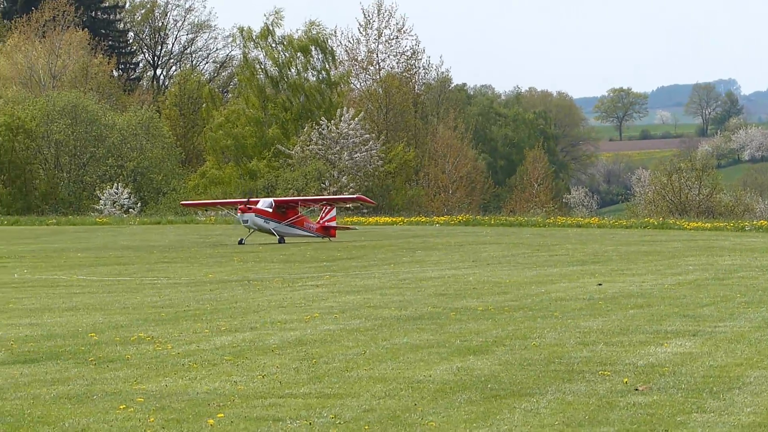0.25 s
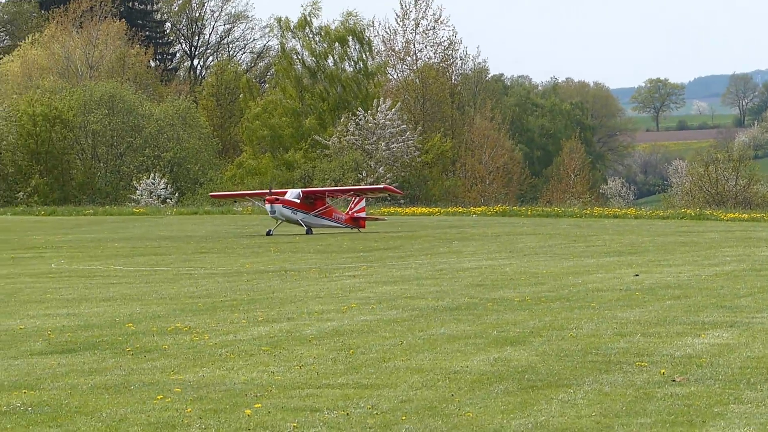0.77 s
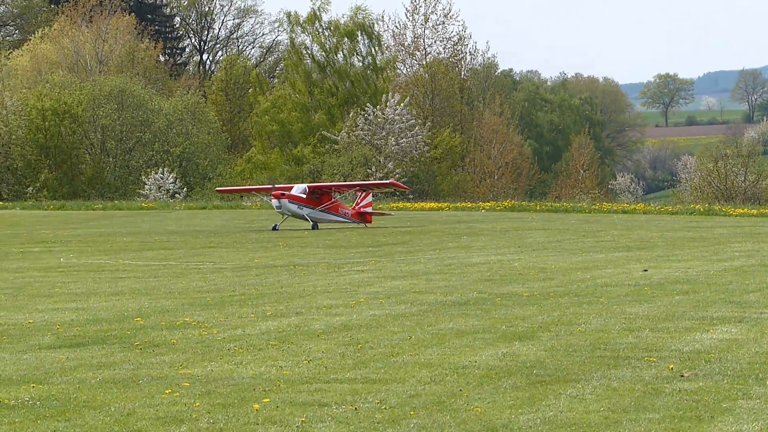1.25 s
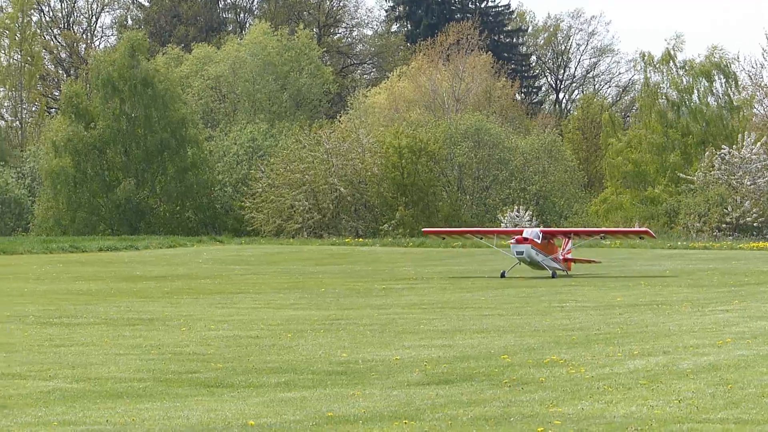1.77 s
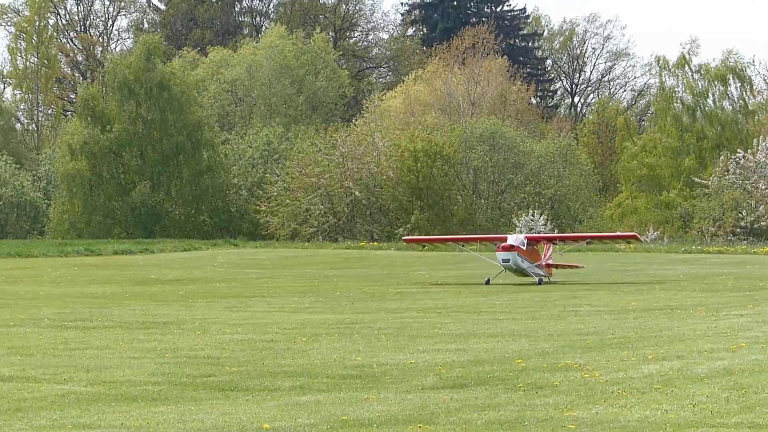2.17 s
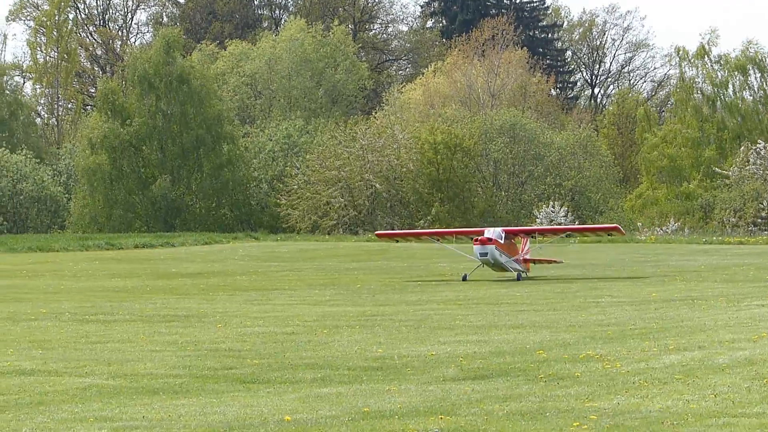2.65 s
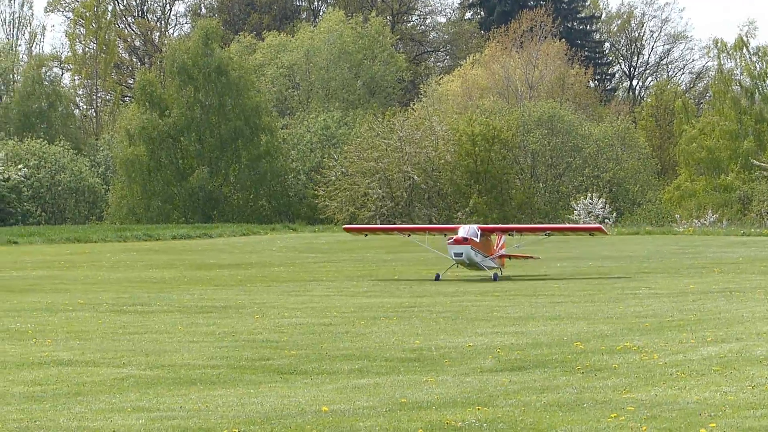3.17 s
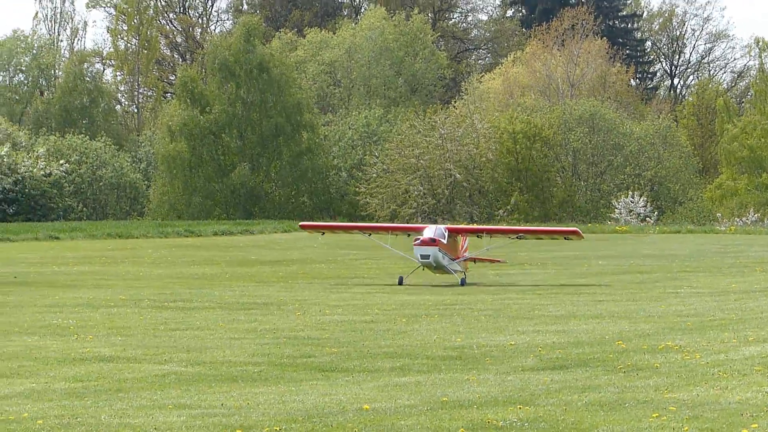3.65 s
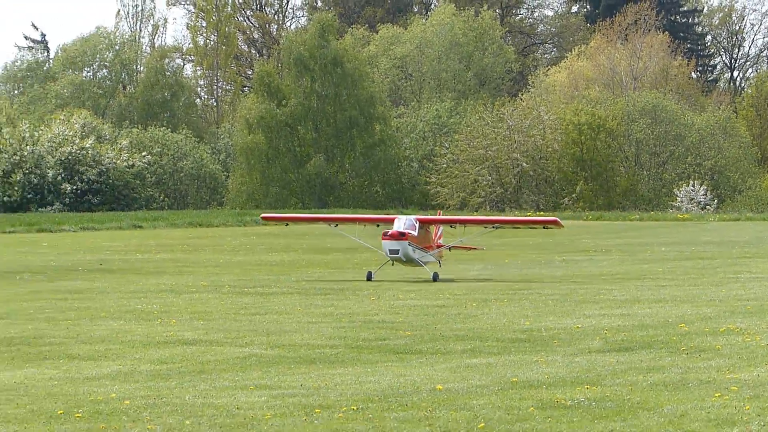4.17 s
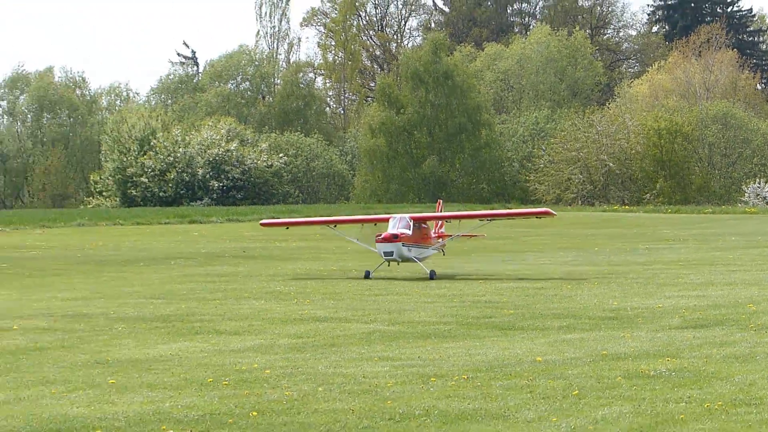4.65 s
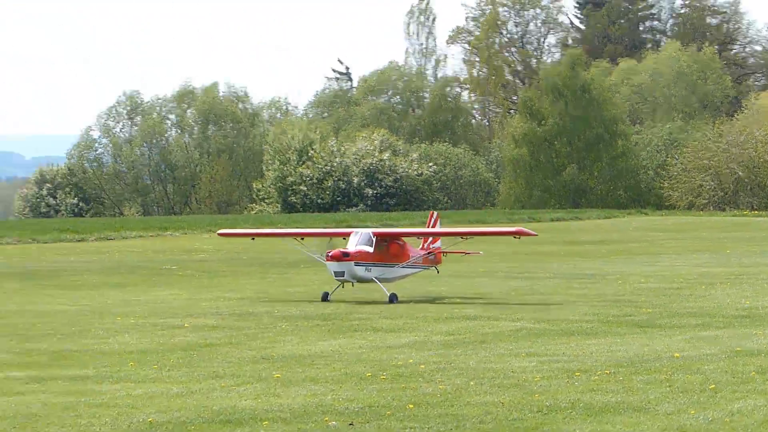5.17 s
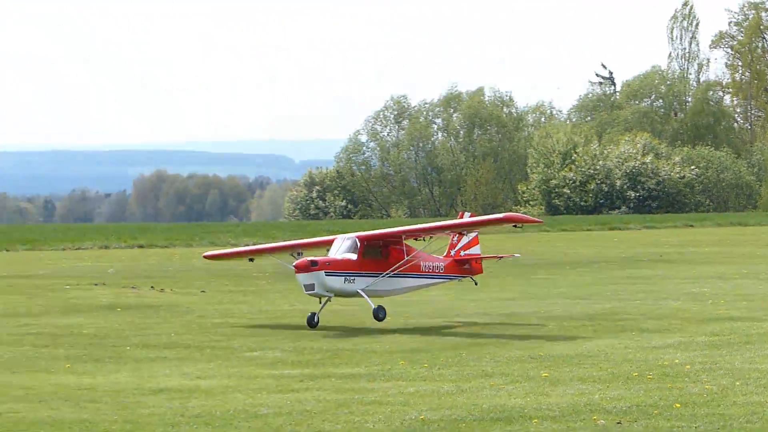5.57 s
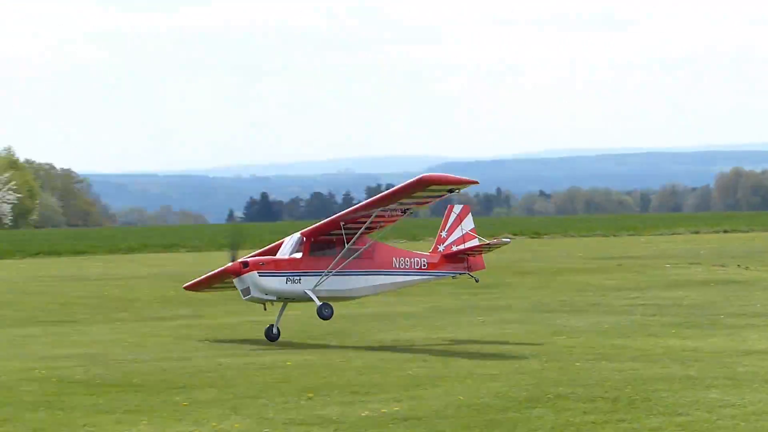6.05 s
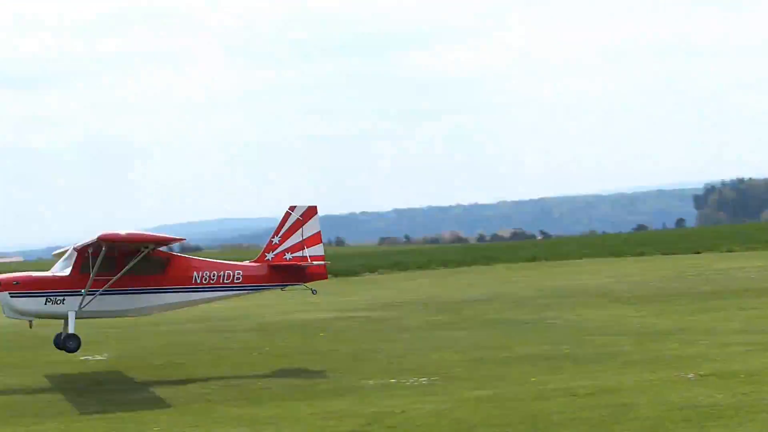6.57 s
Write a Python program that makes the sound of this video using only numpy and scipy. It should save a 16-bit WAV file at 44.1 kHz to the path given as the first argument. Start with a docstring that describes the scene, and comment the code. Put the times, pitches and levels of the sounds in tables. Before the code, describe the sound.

Thumping wind and brief bird whistles cut to silence, then a small propeller plane's low hum climbs into a loud rasping buzz passing nearby.

```python
"""Petrol model plane over a grass field

Two scenes with a silent gap between them. The first, mono, has wind on a microphone, field hiss
and birds, made of shaped noise, decaying thumps and gliding tones. In the second, stereo, the
engine revs up and comes near: cosines at low multiples of the shaft speed, exhaust pulses mixed
with noise that puffs at each firing, and propeller hiss, with wind on the two microphone ports."""
import sys
import numpy as np
from scipy import signal
from scipy.fft import rfft, irfft, next_fast_len
from scipy.io import wavfile
from scipy.ndimage import uniform_filter1d

SR = 44100
rng = np.random.default_rng(int(sys.argv[2]) if len(sys.argv) > 2 else 0)


def amplitude_ratio(level_db):
    """Convert a level in decibels to the matching linear amplitude (field) ratio."""
    exponent = np.asarray(level_db, float) / 20
    return 10 ** exponent


def unload_wav(signal):
    """Save mono or channel-first audio to the path in sys.argv[1] as 16-bit WAV at rate SR, clipped to [-1, 1]."""
    wavfile.write(
        sys.argv[1],
        SR,
        np.round(np.clip(np.atleast_2d(signal).T, -1, 1) * 32767).astype(np.int16),
    )


N = 300321


def evened(x):
    """Normalisation: scales to rms 1."""
    return x / np.sqrt(np.mean(x ** 2) + 1e-20)


def read(points, hz):
    """Interpolation of a spectrum along a log-frequency axis."""
    f, value = np.transpose(points)
    return np.interp(np.log(hz + 1), np.log(f + 1), value)


def follow(rows):
    """Linear interpolation in time: joins each column of a curve table at every sample."""
    s, *columns = np.transpose(rows)
    return [np.interp(np.arange(N) / SR, s, c) for c in columns]


def filtered(x, response):
    """Linear filtering: multiplies the spectrum of x by response(Hz)."""
    size = next_fast_len(N + SR // 4)
    hz = np.fft.rfftfreq(size, 1 / SR)
    return irfft(rfft(x, size) * response(hz), size)[..., :N]


def coloured(x, points):
    """Spectral shaping: colours x by a spectrum in dB and scales it to rms 1."""
    return evened(filtered(x, lambda hz: amplitude_ratio(read(points, hz))))


def drift(seconds, channels=1):
    """Low-passed random process of rms 1 that changes over the given time."""
    size = int(seconds * SR)
    noise = rng.standard_normal((channels, N))
    return evened(uniform_filter1d(uniform_filter1d(noise, size), size))


def bumps(rows):
    """Superposed bell-shaped level changes, given as (middle s, length s, dB)."""
    t = np.arange(N) / SR
    return sum(db * np.exp(-((t - s) / (length / 2)) ** 2) for s, length, db in rows)


# Shaft speed. Each row: time in seconds, turns per second.
SHAFT_SPEED = [(1.61, 49.7), (1.87, 51.3), (2.16, 54.28), (2.47, 55.9), (2.69, 58.06), (2.94, 63),
               (3.12, 64), (3.51, 65.1), (3.86, 70.2), (4.46, 70.2), (4.85, 73.1), (5.07, 76.67),
               (5.42, 85.2), (5.62, 87), (5.99, 89.6), (6.32, 89.6), (6.5, 89.1), (6.63, 88.2),
               (6.81, 87.8)]


def engine():
    """Rotating source: one shaft phase drives the low orders and the exhaust; airflow adds a roar."""
    speed = uniform_filter1d(follow(SHAFT_SPEED)[0], size=SR // 8)  # the propeller's inertia
    turns = np.cumsum(speed * (1 + .001 * drift(.05)[0])) / SR
    return low_orders(turns, speed) + exhaust(turns, speed) + airflow_roar()


# Source levels. Each row: time in seconds, level of the higher shaft orders in dB,
# exhaust rasp in dB, propeller hiss in dB.
ENGINE_LEVELS = [(1.61, -56.5, -73, -57.5), (1.85, -57.5, -80, -61.5), (2.0, -53, -72, -60),
                 (2.045, -50, -73, -52), (2.1, -52, -70, -60), (2.4, -55.5, -56.5, -62),
                 (2.8, -54, -51, -55), (3.1, -47.5, -48, -52.5), (3.5, -47.5, -48.5, -50),
                 (3.65, -45, -45.5, -46.5), (3.85, -40.5, -44, -44.5), (4.03, -44, -43, -46.5),
                 (4.09, -42, -44, -50), (4.18, -42.5, -44, -49.5), (4.4, -40, -42.5, -45),
                 (4.6, -42, -41, -35), (4.9, -37, -37, -30.5), (5.08, -34.5, -36.5, -34),
                 (5.25, -38.5, -32.5, -30.5), (5.5, -35, -33, -31), (5.75, -36, -28, -30),
                 (5.9, -35, -30, -28.5), (6.1, -34, -31, -31.5), (6.3, -32, -32, -28.5),
                 (6.55, -31, -26, -29), (6.65, -27, -31.5, -30.5), (6.81, -30.5, -28, -32.5)]
# Hum at twice the shaft speed, growing as the plane nears. Each row: time in seconds, level in dB.
SECOND_ORDER = [(1.61, -49), (1.95, -70), (2.2, -54), (2.45, -51.5), (2.95, -39.5), (3.45, -43.5),
                (3.9, -33.5), (4.45, -38), (5.07, -27), (5.22, -27.5), (5.4, -22.5), (6.4, -21),
                (6.52, -23.5), (6.7, -32), (6.81, -30)]
# Third order, which swells and fades by itself. Each row: time in seconds, level in dB.
THIRD_ORDER = [(1.61, -48), (1.76, -40), (1.92, -41.5), (2.05, -31), (2.4, -38), (2.55, -35.5), (2.63, -42),
               (2.7, -59), (2.86, -33), (3.1, -53), (3.32, -50), (3.55, -39), (3.9, -39), (4.3, -39.5),
               (4.4, -44), (4.5, -40), (4.8, -39), (4.92, -33.5), (5.1, -29), (5.23, -22), (5.36, -26),
               (5.48, -40), (5.56, -29), (5.8, -45), (6.4, -45.5), (6.56, -35.5), (6.81, -29)]
# Strength of the higher orders. Each row: multiple of the shaft speed, relative level in dB.
HIGHER_ORDERS = [(4, 4.5), (5, -3.5), (6, -1), (7, -2.5), (8, 1), (9, -3.5), (10, -2.5)]
# Gain of the higher orders by frequency. Each row: frequency in Hz, gain in dB.
BODY_GAIN = [(195, 10), (220, -5), (245, 2.5), (270, 3.5), (310, -4), (360, -4), (420, -4), (480, -2),
             (540, 1), (600, -3.5), (680, -4.5), (760, -8.5), (900, -13)]
# Single orders swell or sink for a while. Each row: middle in seconds, length in seconds,
# multiple of the shaft speed, change in dB.
ORDER_SWELLS = [(1.774, 0.19, 4, 9.5), (1.993, 0.13, 9, 11), (2.033, 0.29, 5, 12.5), (2.69, 0.23, 10, 14),
                (2.762, 0.26, 4, 15), (3.25, 0.8, 9, 7.5), (3.992, 0.29, 10, 7), (4.4, 0.67, 9, -19),
                (1.9, .3, 7, -12), (2.243, 0.16, 4, 8), (2.4, 0.16, 4, -10), (2.685, 0.22, 8, 5),
                (2.7, .15, 9, 4), (2.85, .15, 9, -3), (2.85, .2, 6, -3), (3.1, 0.34, 6, 3.5),
                (3.42, 0.62, 7, -13), (3.6, 0.17, 9, 4), (3.75, 0.12, 6, -9), (3.75, 0.17, 5, -9),
                (4.1, 0.37, 5, -7), (4.644, 0.24, 7, 5), (4.654, 0.13, 6, -4), (4.85, 0.23, 10, -14),
                (5.398, .25, 10, -4), (5.463, 0.2, 5, -9), (6.25, 0.2, 8, -5.5), (4.876, 0.21, 6, 6),
                (5.425, 0.14, 7, 10), (5.89, 0.41, 10, 11.5), (5.945, 0.25, 7, -9), (6.65, 0.32, 5, -34),
                (6.65, 0.65, 8, 3.5), (6.636, 0.44, 9, -22)]


def low_orders(turns, speed):
    """Harmonic series of the shaft: moving air fades each higher order by itself."""
    even_fade_db, odd_fade_db, fade_s = 1.0, 2.0, .07
    upper_db, rasp_db, _ = follow(ENGINE_LEVELS)
    orders = [(1, rasp_db - 22.0), (2, follow(SECOND_ORDER)[0]), (3, follow(THIRD_ORDER)[0])]
    fades = drift(fade_s, channels=len(HIGHER_ORDERS))
    for (k, strength_db), fade in zip(HIGHER_ORDERS, fades):
        depth_db = odd_fade_db if k % 2 else even_fade_db
        fade_db = depth_db * fade - np.log(10) / 20 * depth_db ** 2  # keeps the mean power
        swells = [(s, length, db) for s, length, multiple, db in ORDER_SWELLS if round(multiple) == k]
        fade_db = fade_db + bumps(swells)
        orders.append((k, upper_db + strength_db + read(BODY_GAIN, k * speed) + fade_db))
    wobble_db = 0.95 * drift(0.016, channels=len(orders))
    low = np.zeros(N)
    for (k, db), wobble in zip(orders, wobble_db):
        phase = k * turns + 0.0593 * k ** 2  # in cycles
        low += amplitude_ratio(db + wobble) * np.cos(2 * np.pi * phase)
    return np.sqrt(2) * low


# Spectrum of the airflow. Each row: frequency in Hz, relative level in dB.
ROAR_SPECTRUM = [(60, -51), (120, -6), (300, -1.5), (600, -16), (800, -46.5), (1100, -46)]


def airflow_roar():
    """Broadband flow noise: shaped noise whose level in dB rises half as fast as the rasp's."""
    rasp_db = follow(ENGINE_LEVELS)[1]
    return amplitude_ratio(0.51 * rasp_db - 28.0) * coloured(rng.standard_normal(N), ROAR_SPECTRUM)


def firing_pulses(turns, speed):
    """Periodic excitation: upper orders as regular pulses, and noise modulated at each firing."""
    firing_spread_db = .9  # each turn fires with its own strength
    upper_fade_db, upper_fade_s = 2.2, .22  # the upper orders come and go one by one
    shaky = turns + .0007 * drift(.006)[0]
    lag = np.cumsum(.17 * rng.standard_normal(70))  # the pipe smears each pulse, in cycles
    steps = rng.standard_normal((N // 256 + 1, 70))
    steps = uniform_filter1d(steps, size=round(upper_fade_s * SR / 256), axis=0)
    fade = evened(uniform_filter1d(steps, size=6, axis=0))
    fades = amplitude_ratio(upper_fade_db * fade - np.log(10) / 20 * upper_fade_db ** 2)
    regular = np.zeros(N)
    for k in range(11, 70):
        # two firings a turn, the second weaker, so that odd orders stay
        strength = (1 + 0.26 * (-1) ** k) * np.repeat(fades[:, k], 256)[:N]
        regular += strength * np.cos(2 * np.pi * (k * shaky + lag[k]))
    regular *= 2 * np.sqrt(speed / SR)  # as dense per Hz as white noise
    turn_db = firing_spread_db * rng.standard_normal(int(turns[-1]) + 2)
    firing_db = turn_db[np.round(turns).astype(int)]
    regular *= amplitude_ratio(uniform_filter1d(firing_db, size=100) - np.log(10) / 20 * firing_spread_db ** 2)
    half = 2 * turns
    strength_db = firing_db - 5 * (np.floor(half) % 2) + 1.3 * drift(0.0011)[0]
    puff = 0.77 + amplitude_ratio(strength_db) * np.exp(-(half % 1) / 0.69)
    return regular, evened(puff * rng.standard_normal(N))


# Rasp of pipe and cowl, far and near. Each row: frequency in Hz, relative level in dB per Hz.
FAR_RASP, NEAR_RASP = [(470, -38), (800, -7), (970, 0.5), (1040, -3.5), (1160, 8), (1300, 4.5),
                       (1540, -7.5), (1930, -6), (2230, -5.5), (2420, -13), (3100, -18), (4030, -36),
                       (6820, -120)], [(470, -39), (800, -4), (896, 2), (938, -3), (1060, -9.5),
                                         (1550, 2.5), (2080, 7.5), (2230, -2), (2500, 16), (2900, -3),
                                         (3100, 8), (4030, -6), (6820, -120)]
# Propeller hiss, far and near. Each row: frequency in Hz, relative level in dB per Hz.
FAR_HISS, NEAR_HISS = [(1760, -11), (3000, -28), (3320, -19), (3610, 8), (3840, -0.5), (4170, 4.5),
                       (4520, 0), (5190, 5.5), (6410, 1), (9470, 0.5), (13600, -17), (14600, -29),
                       (15400, -23)], [(1760, -21), (3000, 15.5), (3130, 6), (3420, -7), (4030, 4.5),
                                         (4250, 2), (4460, -3), (5080, 2), (5550, -2), (6030, -6.5),
                                         (7200, -3.5), (9280, -5), (13500, -17), (15400, -29)]
# Hump of the silencer. Each row: frequency in Hz, relative level in dB.
SILENCER_HUMP = [(330, -23), (450, 6), (580, 9.5), (720, 7), (800, -21), (950, -45)]
# Bark of the pipe, a broad hump that slides as the plane turns past.
# Each row: time in seconds, centre in Hz, gain in dB.
PIPE_BARK = [(1.61, 1500, -4.5), (4.1, 1500, 1), (4.35, 1430, -6), (5.2, 1390, -4.5), (5.55, 2020, 2),
             (5.8, 1800, 2.5), (6.05, 1590, 3), (6.25, 1540, 3), (6.45, 1560, 1), (6.57, 1490, 9),
             (6.65, 1420, 5.5), (6.75, 1400, 2.5), (6.81, 1390, 0)]
# A higher resonance of the cowl that swells and sinks. Each row: time in seconds, centre in Hz, gain in dB.
COWL_RING = [(1.61, 2300, -6), (4.1, 2500, 0), (4.5, 2400, 2), (5.2, 2540, -1.5), (5.55, 2580, -3),
             (5.8, 2500, -4.5), (6.1, 2500, -1.5), (6.35, 2520, 3), (6.55, 2700, 2), (6.81, 2500, 0)]


def exhaust_power(hz, frames, near, hump_db, rasp_db, hiss_db):
    """Source-filter principle: power spectra of silencer, rasp and hiss under moving resonances."""
    power = 0
    for far_points, near_points, db in ((SILENCER_HUMP, SILENCER_HUMP, hump_db),
                                        (FAR_RASP, NEAR_RASP, rasp_db),
                                        (FAR_HISS, NEAR_HISS, hiss_db)):
        shape_db = np.outer(read(far_points, hz), 1 - near) + np.outer(read(near_points, hz), near)
        shape = amplitude_ratio(shape_db) ** 2
        power = power + shape / shape.mean(0) * amplitude_ratio(db[frames]) ** 2
    for rows, octaves in ((PIPE_BARK, 0.21), (COWL_RING, 0.17)):
        centre_hz, peak_db = (c[::256][frames] for c in follow(rows))
        distance = np.log2((hz[:, None] + 1) / centre_hz) / octaves
        power = power * amplitude_ratio(peak_db * np.exp(-distance ** 2)) ** 2
    return power


def air_patches(shape):
    """Propagation through uneven air: random level patches in frequency and time."""
    patches = rng.standard_normal(shape[::-1]).T
    for _ in range(2):
        patches = uniform_filter1d(uniform_filter1d(patches, size=4, axis=0), size=12, axis=1)
    return amplitude_ratio(1.4 * evened(patches))  # spread in dB


# Colour from far to near. Each row: time in seconds, nearness from 0 to 1.
NEARNESS = [(1.61, 0), (2.2, 0.03), (2.5, 0.37), (4.0, 0.1), (4.08, 0), (4.18, 0.37), (4.5, 0.58),
            (5.3, 0.51), (5.7, 0.7), (6.2, 0.61), (6.81, 0.56)]
# Regularity of the exhaust. Each row: frequency in Hz, amplitude share of regular pulses.
PULSE_SHARE = [(500, .93), (1000, .86), (1600, .87), (2600, .8), (3600, .58), (4500, .45), (6000, .25)]


def exhaust(turns, speed):
    """Short-time spectral filtering: regular pulses and puffing noise mixed by frequency and coloured."""
    flicker_db, flicker_s = 0.53, 0.068  # the near exhaust flickers
    near = follow(NEARNESS)[0]
    upper_db, rasp_db, hiss_db = follow(ENGINE_LEVELS) + flicker_db * near * drift(flicker_s)
    upper_db, rasp_db, hiss_db, near = (c[::256] for c in (upper_db, rasp_db, hiss_db, near))
    pulses = firing_pulses(turns, speed)
    hz, _, (lines, noise) = signal.stft(pulses, SR, nperseg=1024, noverlap=768)
    hump_db = upper_db + 0.5 - 2.0 * near  # the silencer's hump recedes nearby
    frames = np.minimum(np.arange(noise.shape[1]), len(near) - 1)
    power = exhaust_power(hz, frames, np.clip(near[frames], 0, 1), hump_db, rasp_db, hiss_db)
    clean = read(PULSE_SHARE, hz)[:, None]
    mixed = clean * lines + np.sqrt(1 - clean ** 2) * noise
    z = mixed * np.sqrt(power) * air_patches(noise.shape)
    return surged(signal.istft(z, SR, nperseg=1024, noverlap=768)[1][:N])


# Sudden flares of the exhaust. Each row: start in seconds, strength in dB before the envelope,
# decay in seconds (half the time in which the fall reaches 1/e).
RASP_SURGES = [(5.24, 1, 0.02), (5.42, 2.5, 0.026), (5.54, 4, 0.018), (5.612, 4.5, 0.013),
               (5.635, 2, 0.012), (5.692, 7.5, 0.017), (5.76, 3, 0.025), (5.803, 6.5, 0.013),
               (5.828, 4, 0.019), (5.914, 5.5, 0.021), (6.006, 6, 0.018), (6.053, 4, 0.012),
               (6.15, 3.5, 0.036), (6.375, 3.5, 0.025), (6.48, 0, 0.016), (6.52, 3, 0.012),
               (6.565, 1, 0.014), (6.667, 4.5, 0.022), (6.738, 4, 0.018), (6.795, 1.5, .02)]


def surged(x):
    """Transient modulation: sudden flares that die away, strongest in one band."""
    rise_s, centre_hz, octaves = .002, 1930, 1
    outside = 0.42  # share of the dB outside the band
    t, surge_db = np.arange(N) / SR, np.zeros(N)
    for s, db, decay_s in RASP_SURGES:
        age = np.maximum(t - s, 0)
        surge_db += db * (1 - np.exp(-age / rise_s)) * np.exp(-(age / (2 * decay_s)) ** 2)
    band = filtered(x, lambda hz: np.exp(-(np.log2((hz + 1) / centre_hz) / octaves) ** 2))
    return amplitude_ratio(surge_db) * band + amplitude_ratio(outside * surge_db) * (x - band)


# Level difference of the ports. Each row: frequency in Hz, left over right in dB.
PORT_LEVEL = [(60, 4), (110, 2.5), (200, 9), (380, 5.0), (700, -2), (1290, -3), (2370, -1.0), (4380, 0.5),
              (8090, -1.5), (14900, 2.5)]
# Phase difference of the ports. Each row: frequency in Hz, lead of the left in radians.
PORT_LEAD = [(40, -0.58), (130, 0.17), (250, -0.82), (430, -1.1), (700, -0.58), (1380, -0.1), (2070, -0.36),
             (2330, -0.0), (15100, -0.0)]


def ports(x):
    """Interchannel differences: two ports differ in level and, in the bass, phase; their mean is x."""
    def pair(hz):
        ratio = amplitude_ratio(read(PORT_LEVEL, hz)) * np.exp(1j * read(PORT_LEAD, hz))
        return 2 * np.array([ratio, np.ones(len(hz))]) / (1 + ratio)
    return filtered(x, pair)


def diffuse(x, size, decay_s):
    """Reverberation: convolves x with a noise tail of unit energy that falls 60 dB in decay_s."""
    t = np.arange(size) / SR
    tail = rng.standard_normal(size) * amplitude_ratio(-60 * t / decay_s)
    return signal.fftconvolve(x, tail / np.linalg.norm(tail))[:N]


# Sound scattered by grass and trees. Each row: frequency in Hz, level relative to the direct sound in dB.
SCATTER_LEVEL = [(60, -16), (200, -48), (500, -10.5), (1000, -8), (2000, -22.5), (2600, -46), (4000, -76),
                 (8000, -26.5)]


def scattered(x):
    """Diffuse scattering: a short tail of opposite sign in the two ports."""
    wet = diffuse(x, SR // 8, 0.14)
    return np.outer([1, -1], filtered(wet, lambda hz: amplitude_ratio(read(SCATTER_LEVEL, hz))))


def lumpy(points, lumps_db, channels=1):
    """Turbulence: eddies of uneven size burst on the membrane."""
    noise = rng.standard_normal((channels, N)) * amplitude_ratio(lumps_db * drift(0.0023, channels))
    return coloured(noise, points)


# Gusts. Each row: time in seconds, strength in dB.
GUSTS = [(0.0, -41.5), (0.094, -38.5), (0.252, -48.5), (0.35, -44.5), (0.41, -69), (0.636, -75),
         (0.69, -49), (0.96, -47.5), (1.16, -43.5), (1.19, -40), (1.3, -38.5), (1.354, -40.5)]
# Spectra of the wind's body and flutter. Each row: frequency in Hz, relative level in dB.
BODY_SPECTRUM, FLUTTER_SPECTRUM = [(25, -39), (60, -22), (100, -6), (180, 5), (300, 0), (450, -24.5),
                                   (700, -60)], [(150, -34), (350, 3.5), (700, -7), (1200, -17),
                                                      (2500, -42)]
# Slaps of wind on the microphone. Each row: start in seconds, strength in dB before the envelope,
# pitch of the thump in Hz.
WIND_SLAPS = [(0.028, -35, 208), (0.057, -41, 159), (0.093, -27, 174), (0.133, -26, 200),
              (0.166, -29.5, 232), (0.198, -31, 215), (0.227, -46, 148), (0.278, -33, 128),
              (0.34, -40, 141), (0.69, -34, 128), (0.719, -32, 110), (0.76, -36, 160), (0.816, -39, 210),
              (0.845, -44, 172), (0.879, -38, 180), (0.911, -36, 180), (0.959, -35, 187), (0.986, -34, 144),
              (1.008, -31, 220), (1.052, -31.5, 210), (1.056, -37, 496), (1.084, -36.5, 232),
              (1.14, -35, 245), (1.178, -27, 200), (1.179, -34.5, 483), (1.203, -29.5, 170),
              (1.239, -29, 300), (1.263, -25, 195), (1.301, -39, 333), (1.322, -31.5, 247)]


def wind():
    """Pressure fluctuation on a membrane: gusts, and sudden slaps that thump it, in the first scene."""
    rise_s, fall_s = .005, .011
    low_hz = 90  # the membrane passes little below this
    gust_db = follow(GUSTS)[0]
    flutter_db = -49.5 + 1.9 * (gust_db + 40)  # grows faster than the gust
    t = np.arange(round(CUT_OUT_S * SR)) / SR
    slaps, thumps = np.zeros(N), np.zeros(N)
    for (s, db, hz), turn in zip(WIND_SLAPS, rng.random((len(WIND_SLAPS), 1))):
        age = np.maximum(t - s, 0)
        shape = amplitude_ratio(db) * (1 - np.exp(-age / rise_s)) * np.exp(-age / fall_s)
        slaps[:len(t)] += shape
        thumps[:len(t)] += shape * np.sin(2 * np.pi * (hz * age + turn))
    flutter = (amplitude_ratio(flutter_db) + amplitude_ratio(-14.0) * slaps) * lumpy(FLUTTER_SPECTRUM, 3.1)
    body = (amplitude_ratio(gust_db - 4.5) + amplitude_ratio(-12.0) * slaps) * lumpy(BODY_SPECTRUM, 4.3)
    return body + flutter + amplitude_ratio(4) * filtered(thumps, lambda hz: hz ** 2 / (hz ** 2 + low_hz ** 2))


# Puffs on the ports. Each row: middle in seconds, length in seconds, left in dB, right in dB.
PORT_PUFFS = [(1.625, .04, -36, -38), (1.68, .03, -41, -39), (1.88, .035, -40, -38), (2.29, .03, -40, -39),
              (2.405, .03, -34, -35), (2.65, .04, -39, -40), (2.75, .03, -44, -44), (4.42, .08, -40, -42),
              (5.2, .1, -40, -40), (6.48, .04, -36, -36), (6.68, .06, -28, -28), (6.74, .08, -28, -26)]
# Steady wind on each port. Each row: time in seconds, level in dB.
BREEZE = [(1.6, -44), (2.0, -49), (3, -54), (4.5, -51), (5.2, -46), (5.6, -50), (6.8, -49)]
# Spectrum of the puffs. Each row: frequency in Hz, relative level in dB.
PUFF_SPECTRUM = [(25, -19), (60, -8), (110, -5), (250, 10), (350, -14), (500, -10.5), (1000, -35),
                 (2000, -66)]


def puffs():
    """Partly opposed turbulence: wind pushes the two ports in the second scene."""
    t = np.arange(N) / SR
    level = amplitude_ratio(follow(BREEZE)[0]) * np.ones((2, N))
    for s, length, left_db, right_db in PORT_PUFFS:
        level += amplitude_ratio(np.array([[left_db], [right_db]])) * np.exp(-((t - s) / (length / 2)) ** 2)
    eddies = lumpy(PUFF_SPECTRUM, 0.98, channels=2)
    return level * evened(eddies - .35 * eddies[::-1])


# Whistled notes. Each row: start in seconds, length in seconds, first, middle and last pitch in Hz,
# level in dB before swell and throb, depth of throb from 0 to 1.
BIRD_NOTES = [(.012, .14, 4050, 3200, 2990, -45, .55), (.128, .165, 4300, 3730, 4650, -60.5, 0),
              (.184, .028, 2150, 2600, 2150, -51, 0), (.208, .08, 2120, 2260, 1850, -49, .2),
              (.345, .085, 1500, 1400, 1100, -56, .3), (.81, .075, 1560, 1420, 1200, -58, .3)]


def birds():
    """Frequency modulation: whistles glide in a curve under one swell, with a soft echo from the trees."""
    throb_hz, throb_peak_s = 24, .037
    out = np.zeros(N)
    for start, length, first_hz, middle_hz, last_hz, db, depth in BIRD_NOTES:
        u = np.linspace(0, 1, round(length * SR))
        glide = np.polyfit([0, .5, 1], [first_hz, middle_hz, last_hz], 2)
        hz = np.polyval(glide, u ** .7)  # quick at first
        throb = 1 + depth * np.cos(2 * np.pi * throb_hz * (start + length * u - throb_peak_s))
        swell = np.sin(np.pi * u ** .7) ** 1.1 * throb
        at = round(start * SR)
        out[at:at + len(u)] += amplitude_ratio(db) * np.sqrt(2) * swell * np.sin(2 * np.pi * np.cumsum(hz) / SR)
    return out + amplitude_ratio(-7) * diffuse(out, SR // 4, 0.44)


# Spectrum of leaves and air. Each row: frequency in Hz, relative level in dB per Hz.
FIELD_SPECTRUM = [(24, -48), (40, -54), (146, 10), (426, -10), (619, -5), (775, -7), (922, -10),
                  (1440, -12.5), (2050, -11.5), (2320, -12.5), (3450, -18.5), (5410, -15.5), (5970, -21),
                  (8900, -25.5), (15400, -44.5)]


def field():
    """Stationary ambient noise: distant leaves and air, drifting slightly in level."""
    return coloured(rng.standard_normal(N), FIELD_SPECTRUM) * amplitude_ratio(1.4 * drift(0.038)[0])


# Field hiss of opposite sign in the ports. Each row: frequency in Hz, gain in dB.
FIELD_OPPOSITE = [(200, -14), (1000, 5), (2500, -7), (5000, -11), (10000, -10), (12000, -40)]


def wide_field(level_db):
    """Decorrelation: a separate field hiss of opposite sign in the two ports."""
    return np.outer([1, -1], filtered(field(), lambda hz: amplitude_ratio(level_db + read(FIELD_OPPOSITE, hz))))


CUT_OUT_S, CUT_IN_S = 1.3545, 1.615  # end of the first scene, start of the second


def scene():
    """Superposition of sources within each scene, one scene after the other."""
    first_field_db, second_field_db = -50, -46.5
    t = np.arange(N) / SR
    first = wind() + amplitude_ratio(first_field_db) * field() + birds()
    distant = engine() + amplitude_ratio(second_field_db) * field()
    second = ports(distant) + scattered(distant) + wide_field(second_field_db) + puffs()
    return first * (t < CUT_OUT_S) + second * (t >= CUT_IN_S)


def band_limit(x):
    """A steep low-pass at the top of the band."""
    return signal.sosfilt(signal.butter(12, 15540, fs=SR, output="sos"), x)


def record(dry):
    """Superposition is complete: delivers the finished mix."""
    return band_limit(dry)


dry = scene()
out = record(dry)
unload_wav(out)
```